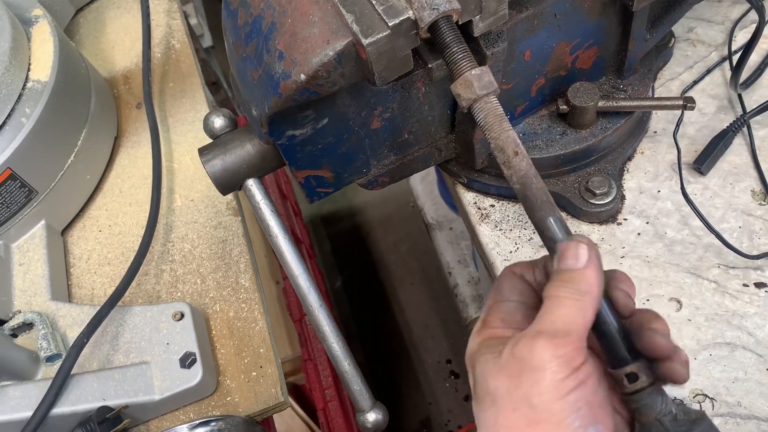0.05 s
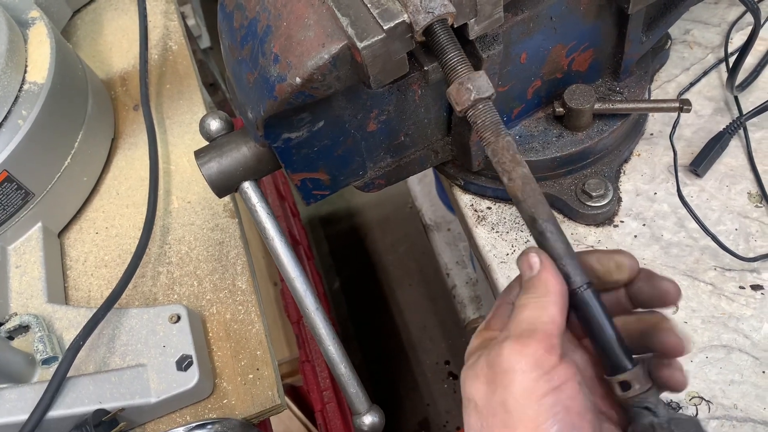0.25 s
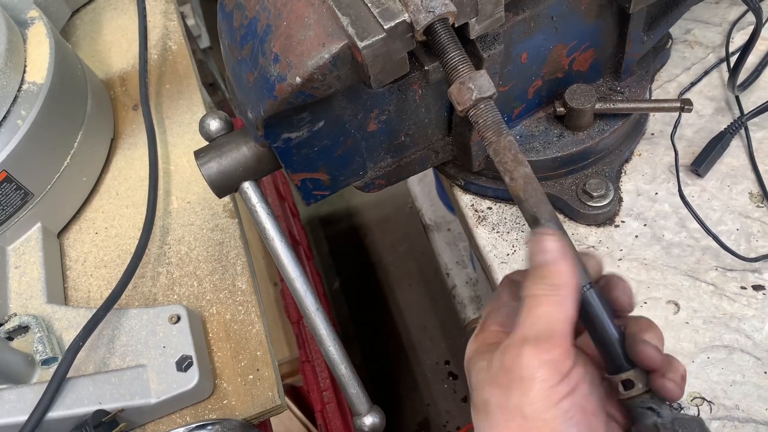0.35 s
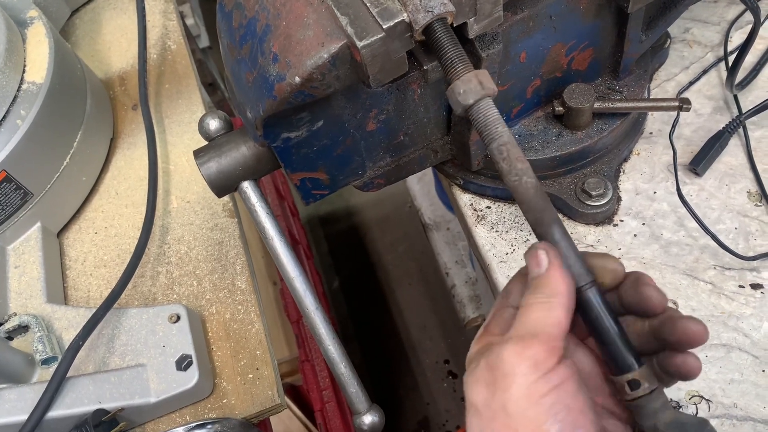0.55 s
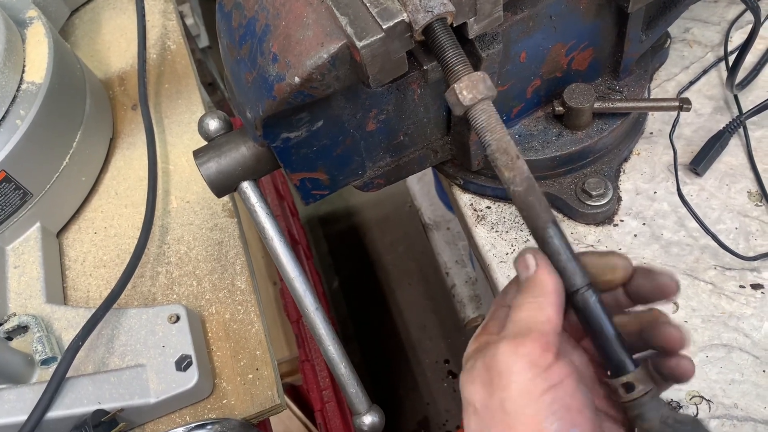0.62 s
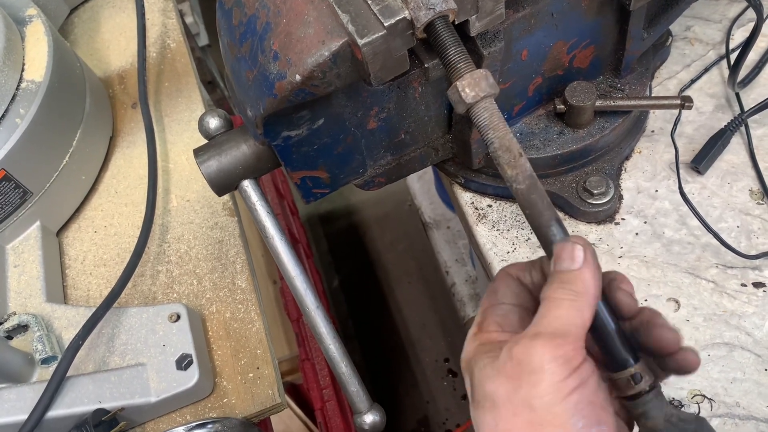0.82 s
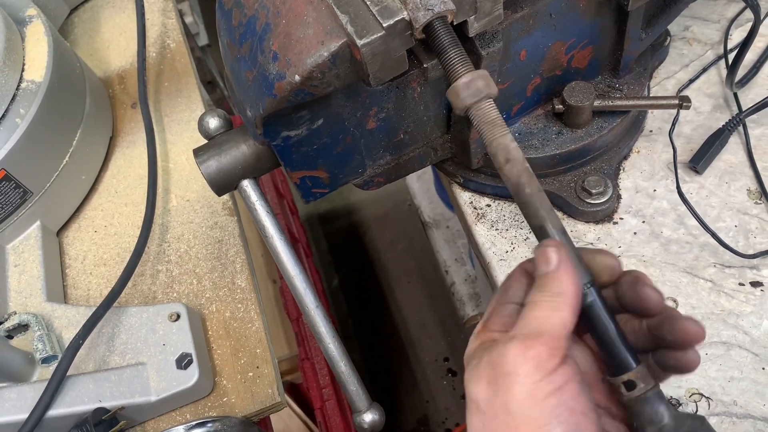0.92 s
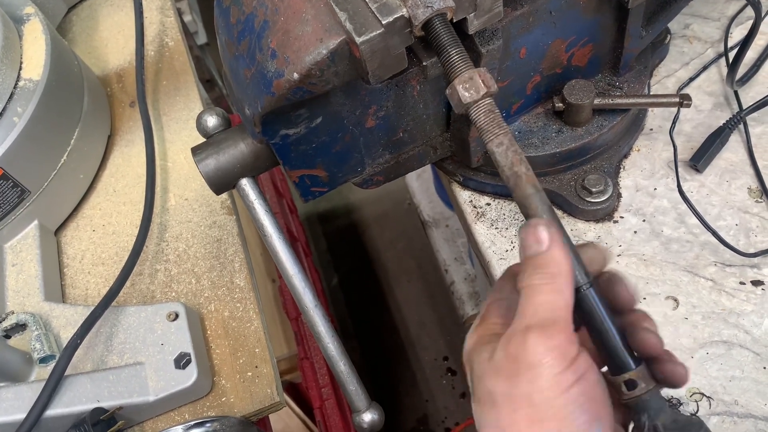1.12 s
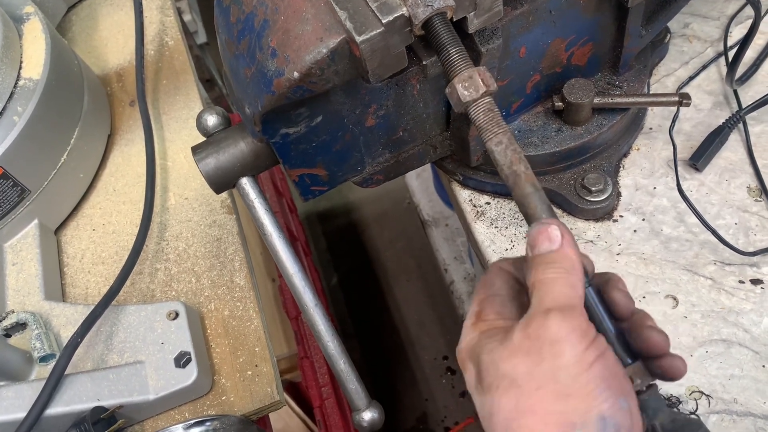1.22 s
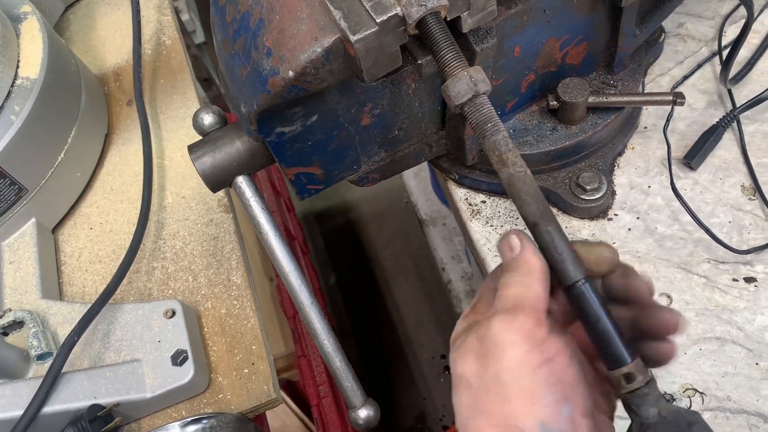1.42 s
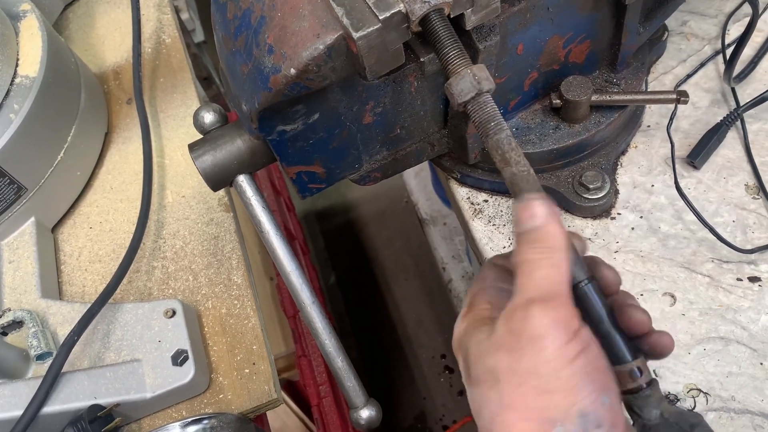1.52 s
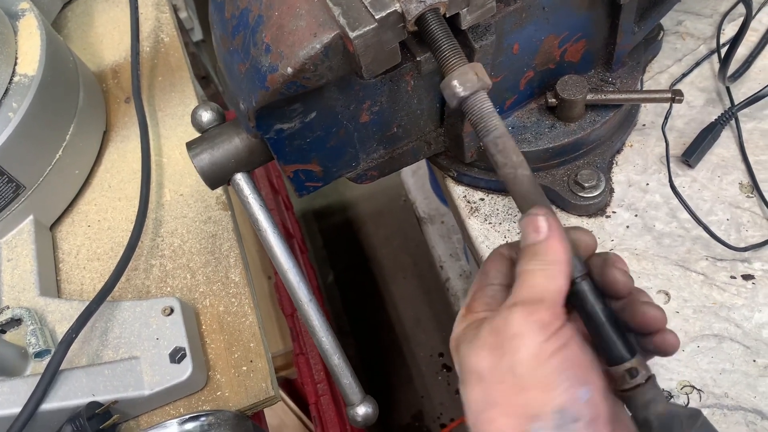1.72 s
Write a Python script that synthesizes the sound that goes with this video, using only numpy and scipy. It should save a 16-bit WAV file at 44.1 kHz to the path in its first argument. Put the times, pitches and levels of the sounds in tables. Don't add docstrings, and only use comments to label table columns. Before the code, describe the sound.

Dry, gritty metal scraping comes in uneven bursts as a hand turns a rod in a nut; dull knocks on the vice and deep thuds accompany it, easing briefly before returning, closely miked with little room.

```python
import sys
import numpy as np
from scipy import signal
from scipy.fft import rfft, irfft
from scipy.io import wavfile
from scipy.ndimage import uniform_filter1d

SR = 44100
rng = np.random.default_rng(int(sys.argv[2]) if len(sys.argv) > 2 else 0)


def unload_wav(signal):
    wavfile.write(
        sys.argv[1],
        SR,
        np.round(np.clip(np.atleast_2d(signal).T, -1, 1) * 32767).astype(np.int16),
    )


def gain_from_db(level_db):
    decades = np.asarray(level_db, float) / 20
    return 10 ** decades


N = 77175


def unit(x):
    return x / np.sqrt(np.mean(x ** 2))


def across(table):
    table = np.array(table)
    bins_hz = np.fft.rfftfreq(2 * N, 1 / SR)
    return np.interp(np.log(bins_hz + 1), np.log(table[:, 0]), table[:, 1])


def colour(x, table):
    return irfft(rfft(x, 2 * N) * gain_from_db(across(table)))[:N]


def band(x, hz, width_hz):
    return signal.lfilter(*signal.iirpeak(hz, hz / width_hz, SR), x)


def walk(rate_hz):
    k = int(SR / rate_hz)
    steps = np.repeat(rng.standard_normal(N // k + 1), k)
    return 1.11 * uniform_filter1d(uniform_filter1d(steps, k), k)[:N]


def grit(per_s, spread_db):
    contacts = (rng.random(N) < per_s / SR) * rng.standard_normal(N)
    size = np.minimum(rng.exponential(size=N), 4)
    return unit(contacts * gain_from_db(spread_db * size))


def ring(at_s, db, hz, t60, rise_s, stop_s=9., stop_db=0., over_s=1.):
    out, first = np.zeros(N), int(np.ceil(at_s * SR))
    t = np.arange(first, min(first + SR // 2, N)) / SR - at_s
    damp_db = stop_db * np.clip((t + at_s - stop_s) / over_s, 0, 1)
    envelope = gain_from_db(db - 60 * t / t60 + damp_db) * (1 - np.exp(-t / rise_s)) ** 2
    out[first:first + len(t)] = -envelope * np.sin(2 * np.pi * hz * t)
    return out


def next_onsets(events):
    return [row[0] for row in events[1:]] + [N]


# centre t/s, spread t/s, skin level/dB, thread level/dB, vice level/dB
PUSHES = [(0.069, 0.052, -77.5, -83, -104), (0.128, 0.018, -61, -65, -67.5), (0.161, 0.018, -64, -61, -73),
          (0.203, 0.033, -57.5, -57, -63), (0.274, 0.031, -69.5, -61, -54), (0.389, 0.068, -99, -73, -69.5),
          (0.458, 0.011, -71, -69, -67), (0.502, 0.032, -57.5, -57.5, -63), (0.558, 0.042, -66, -69, -66.5),
          (0.619, 0.017, -59, -60.5, -59.5), (0.666, 0.023, -97, -66.5, -58),
          (0.854, 0.025, -75, -68.5, -71.5), (0.926, 0.023, -59.5, -67, -65.5),
          (0.975, 0.026, -64.5, -63.5, -66.5), (1.042, 0.034, -78, -77.5, -72),
          (1.174, 0.043, -78, -74.5, -112), (1.268, 0.015, -70, -64.5, -72.5),
          (1.323, 0.042, -67.5, -69, -67), (1.368, 0.032, -56.5, -55.5, -65.5),
          (1.416, 0.018, -66.5, -60, -51), (1.481, 0.067, -65.5, -69.5, -65),
          (1.55, 0.0076, -63.5, -76, -68), (1.606, 0.018, -69, -77.5, -99), (1.683, 0.037, -70.5, -68, -67)]


def effort(col):
    t = np.arange(N) / SR
    return np.sqrt(sum(gain_from_db(2 * row[col]) * np.exp(-((t - row[0]) / row[1]) ** 2) for row in PUSHES))


# f/Hz, level/dB
SHOP_SPECTRUM = [(71, -65), (120, -7), (230, -9), (846, -14.5), (4570, -32.5), (8770, -29), (10300, -25.5),
                 (11900, -38), (13400, -24.5), (15500, -22)]


def shop():
    return unit(colour(rng.standard_normal(N), SHOP_SPECTRUM)) * gain_from_db(-74.5 + 1.5 * walk(8))


# t/s, peak level/dB, f/Hz, T60/s
THUMPS = [(.09, -45, 51.4, 0.12), (0.235, -36.5, 68.2, 0.85), (0.25, -30, 62, 0.17), (0.266, -73, 60, 0.37),
          (0.2854, -16.5, 60, 0.14), (0.342, -35.5, 73, 0.18), (.359, -24, 63.3, 0.1),
          (0.548, -34.5, 60, 0.12), (0.6492, -25, 63.1, 0.22), (0.707, -29, 68.2, 0.16),
          (0.793, -44.5, 55.6, 0.32), (.897, -44.5, 66.3, 0.19), (1.075, -42.5, 59, 0.21),
          (1.12, -45, 66, 0.05), (1.225, -51, 52, 0.32), (1.298, -38.5, 55.4, 0.25),
          (1.406, -29.5, 106.8, 0.065), (1.428, -23, 53.7, 0.09), (1.487, -34, 60, 0.079),
          (1.577, -51.5, 60, 1), (1.725, -39.5, 66.4, 0.24)]


def bench():
    rise_s = 0.0053
    sway_db, sway_hz, sway_width_hz = -57.5, 60, 26
    noise = rng.standard_normal(N)
    sway = unit(band(band(noise, sway_hz, sway_width_hz), sway_hz, 79))
    out = sway * (gain_from_db(sway_db - 5.5) + gain_from_db(1) * effort(col=4))
    out = out + gain_from_db(-87.5) * unit(band(noise, 100, 31))
    for (s, db, hz, t60), stop_s in zip(THUMPS, next_onsets(THUMPS)):
        out = out + ring(s, db, hz, t60, rise_s, stop_s, -4.0, 0.0092)
        out = out + ring(s, db - 28, 2.1 * hz, 1.5 * t60, rise_s)
    return out


# f/Hz, bandwidth/Hz, level/dB
THREAD_MODES = [(690, 300, -4), (1090, 160, -4), (1290, 200, -2), (1545, 200, -5), (2050, 560, 3),
                (3420, 500, -9), (4600, 400, -4), (6670, 300, -10), (8000, 4000, -3)]
# t/s, peak level/dB, f/Hz
CATCHES = [(.027, -76, 2180), (.057, -67.5, 2000), (.0847, -61, 1900), (0.115, -61, 1840),
           (.2225, -65, 2320), (.2455, -45, 2310), (.259, -55, 2500), (.2675, -51, 2100), (.274, -58, 2170),
           (.281, -55, 2200), (.300, -47, 1340), (.349, -55, 960), (0.447, -53, 2300), (0.484, -44, 1962),
           (0.533, -38.5, 715), (0.601, -62, 1860), (.629, -43.5, 1050), (0.664, -48, 1920),
           (.809, -80, 1035), (0.839, -59, 1850), (.8465, -51, 2250), (.906, -57, 1610), (.945, -56, 1530),
           (0.976, -47, 1620), (.989, -53.5, 2000), (0.997, -47, 1010), (1.136, -81, 1510),
           (1.153, -61, 1256), (1.199, -55.5, 1050), (1.254, -74, 1120), (1.306, -60, 920),
           (1.3354, -45.5, 910), (1.346, -43, 1980), (1.353, -47, 2080), (1.359, -52, 2120),
           (1.3848, -38.5, 2250), (1.3935, -45, 1780), (1.4025, -55, 2360), (1.409, -62, 2430),
           (1.416, -52, 1390), (1.422, -43, 1170), (1.513, -54, 1220), (1.532, -54, 1110),
           (1.615, -60, 3430), (1.656, -56.5, 1890), (1.672, -63, 2000)]


def thread():
    grains, load = grit(5000, 2.1) * gain_from_db(2.2 * walk(60)), effort(col=3)
    awake = (load / gain_from_db(-72)) ** 0.28
    rod = 0
    for k, (hz, width_hz, db) in enumerate(THREAD_MODES):
        mode = unit(band(band(grains, hz, width_hz), hz, 3 * width_hz))
        mode = mode * gain_from_db(db + 2.15 * walk(19.38)) * awake ** (hz > 3000)
        rod = rod + (-1) ** k * mode
    out = rod * load * gain_from_db(-6.0)
    catch_t60_s = 0.013
    for s, db, hz in CATCHES:
        out = out + ring(s, db + 2.0, hz, catch_t60_s, 0.00032)
        out = out + ring(s, db - 27.5, 1.3 * hz, catch_t60_s, 0.00004)
    return out


# f/Hz, level/dB
SKIN = [(1500, -11.5), (3000, -10.5), (5500, -10), (8500, -4.5), (10500, -11), (12500, -8), (14000, -12.5),
        (15800, -11.5)]


def fingers():
    skin, speed = unit(colour(grit(9000, 1.35), SKIN)), effort(col=2)
    treble = band(skin, 13250, 3700)
    brightness = (speed / gain_from_db(-70.5)) ** 0.86
    return (skin - treble + treble * brightness) * speed * gain_from_db(0.79 * walk(59.65))


# t/s, peak level/dB, upper mode level/dB, crack level/dB, ring share (fraction of T60)
TICKS = [(0.1163, -53.5, 0.5, -20, 0.8), (.2678, -33.5, -14, 3, 0.49), (0.2804, -55.5, -15, 0, 1.8),
         (.4828, -58.5, 8, -4, 1.5), (0.5039, -44, 3.5, 5, 0.5), (0.664, -48.5, -40, -6, 0.51),
         (0.866, -66.5, -13, -14, 0.83), (0.9828, -58, -20, -4, 0.42), (1.029, -68.5, -24, -7, 0.25),
         (1.157, -69, -15, -8, 0.21), (1.384, -64, -12, 24, 0.14), (1.4093, -35.5, -11.5, -1, 0.63)]
NUT_HZ = (4645, 6650)
NUT_T60_S = (.1, .045)
# f/Hz, bandwidth/Hz, level/dB
CRACK = [(2250, 3100, -8.5), (7570, 2700, 7.5), (10260, 620, -5), (13800, 3000, -1)]


def nut():
    crack_s = 0.00083
    twin_hz, twin_db, twin_share = 4590, -14, 0.73
    t, noise = np.arange(N) / SR, rng.standard_normal(N)
    bright = unit(sum(gain_from_db(db) * unit(band(band(noise, hz, width_hz), hz, 0.96 * width_hz))
                      for hz, width_hz, db in CRACK))
    out = 0
    for (s, db, upper_db, crack_db, share), stop_s in zip(TICKS, next_onsets(TICKS)):
        t60 = share * NUT_T60_S[0]
        out = out + ring(s, db, NUT_HZ[0], t60, 0.00017, stop_s, -22, 0.0011)
        out = out + ring(s, db - 30.5, NUT_HZ[0], 0.39, 0.0004)
        out = out + ring(s, db + twin_db, twin_hz, twin_share * t60, 0.0001, stop_s, -21, 0.001)
        out = out + ring(s, db + upper_db, NUT_HZ[1], NUT_T60_S[1], 0.00076)
        age = np.maximum(t - s, 0) / crack_s
        out = out + bright * gain_from_db(db + crack_db + 2.5) * age * np.exp(-age)
    return out


# t/s, peak level/dB, f/Hz, T60/s
KNOCKS = [(0.154, -54, 417, 0.13), (0.2247, -33, 422, 0.071), (0.262, -40, 326, 0.11),
          (.376, -50.5, 293, 0.048), (0.405, -45, 295, 0.044), (0.451, -51, 426, 0.041),
          (0.481, -38.5, 319, 0.057), (0.535, -45, 292, 0.074), (0.624, -49, 392, 0.22),
          (0.64, -44.5, 323, 0.05), (0.699, -56, 250, 0.1), (.812, -54, 430, 0.048),
          (0.848, -59, 429, 0.28), (.923, -47, 577, 0.05), (0.955, -53.5, 394, 0.16),
          (1.274, -60.5, 300, 0.076), (1.284, -50.5, 402, 0.068), (1.3872, -32.5, 344, 0.28),
          (1.4003, -31, 370, 0.031), (1.515, -55, 450, 0.076), (1.678, -61, 273, 0.043),
          (1.709, -45, 389, 0.056)]


def vice():
    rise_s = 0.0017
    grains = band(grit(2500, 1.7) * gain_from_db(2.5 * walk(25)), 507, 444)
    rub = band(grains, 317, 122) - band(grains, 478, 79) + 0.54 * band(grains, 616, 149)
    out = unit(rub) * effort(col=4) * gain_from_db(3.0)
    for (s, db, hz, t60), stop_s in zip(KNOCKS, next_onsets(KNOCKS)):
        out = out + ring(s - 0.002, db - 1.5, hz, t60, rise_s, stop_s - 0.003, -24, 0.0036)
        out = out + ring(s - 0.002, db - 19, 0.815 * hz, t60, rise_s, stop_s, -9, 0.0036)
    return out


def room(near):
    t60_s, level_db = 0.18, -21
    t = np.arange(N) / SR
    tail = rng.standard_normal(N) * gain_from_db(-60 * t / t60_s) * (t > 0.004)
    tail = tail / np.sqrt(np.sum(tail ** 2))
    return near + gain_from_db(level_db) * signal.fftconvolve(near, tail)[:N]


# f/Hz, lead of the right/half-turns
PORTS = [(0, .13), (330, .2), (680, .75), (1500, .15), (4600, 0), (6500, .38), (8650, 1), (16000, 5.56)]
# f/Hz, left minus right level/dB
LEFT_DB = [(60, -1.1), (350, -3), (650, -3.5), (1300, -3.6), (2500, -1.5), (5000, -2), (9000, -0.6)]
# f/Hz, likeness (0-1)
LIKENESS = [(150, .99), (350, .8), (800, .2), (1900, .4), (3000, .3), (4650, .7), (6300, .4), (8600, .7),
            (11000, .9)]


def ports(near):
    t = np.arange(N) / SR
    common = rfft(np.concatenate([near, near[::-1]]))
    scatter = rfft(rng.standard_normal(N) * np.exp(-t / 0.013), 2 * N)
    other = common * scatter / np.sqrt(uniform_filter1d(abs(scatter) ** 2, size=4000))
    like = np.clip(across(LIKENESS), 0, 1) ** 0.5
    mid, side = common * np.sqrt((1 + like) / 2), other * np.sqrt((1 - like) / 2)
    lead = np.pi * np.interp(np.fft.rfftfreq(2 * N, 1 / SR), *np.array(PORTS).T)
    lead = lead - 0.4 * np.sin(2 * lead) * (lead > np.pi)
    turn = np.exp(0.5j * lead) / gain_from_db(across(LEFT_DB) / 2)
    return np.array([irfft((mid + side) / turn)[:N], irfft((mid - side) * turn)[:N]])


def scene():
    airborne = fingers() + thread() + nut() + vice() + shop()
    return ports(room(airborne) + bench())


def low_pass(x):
    return signal.sosfilt(signal.butter(12, 16460, fs=SR, output="sos"), x)


def record(dry):
    bass_cut = signal.butter(3, 34, "high", fs=SR, output="sos")
    top_cut = signal.ellip(10, 0.3, 70, 15850, fs=SR, output="sos")
    mix = signal.sosfilt(top_cut, signal.sosfilt(bass_cut, dry))
    mix = mix * np.clip((N - np.arange(N)) / (0.006 * SR), 0, 1) ** 0.5
    return low_pass(mix)


dry = scene()
out = record(dry)
unload_wav(out)
```